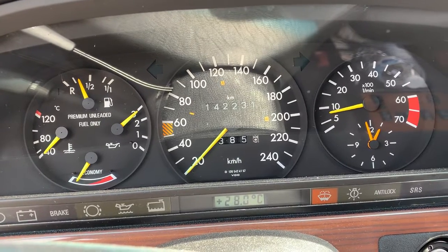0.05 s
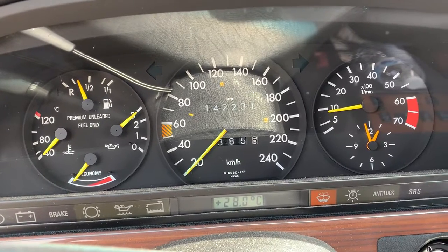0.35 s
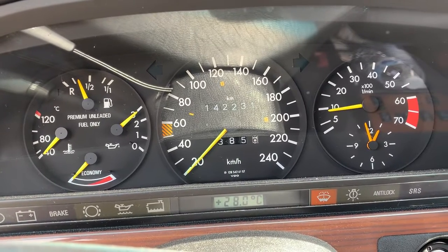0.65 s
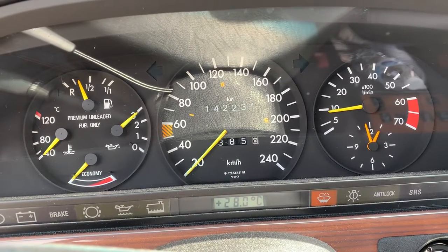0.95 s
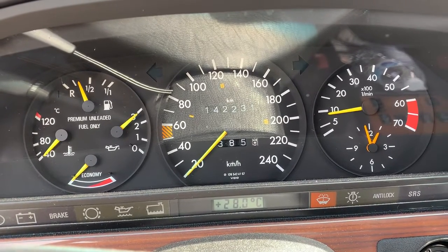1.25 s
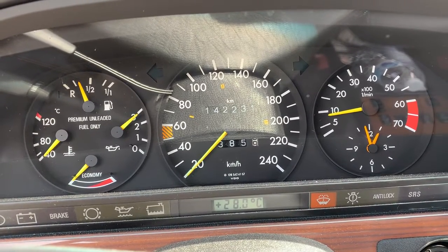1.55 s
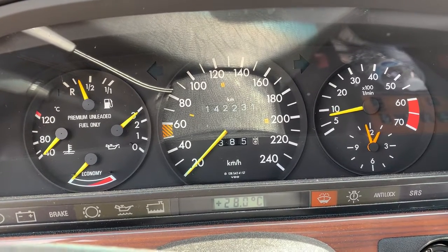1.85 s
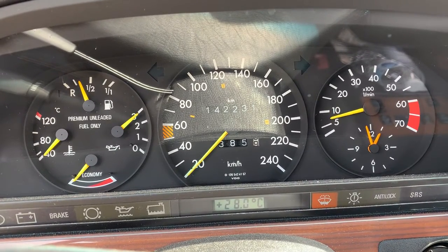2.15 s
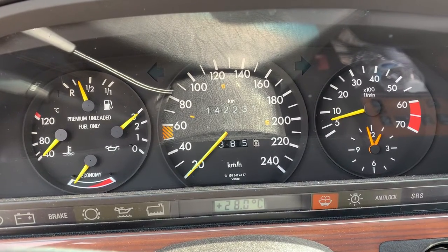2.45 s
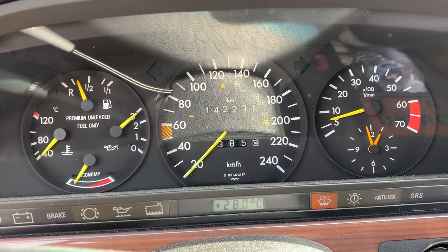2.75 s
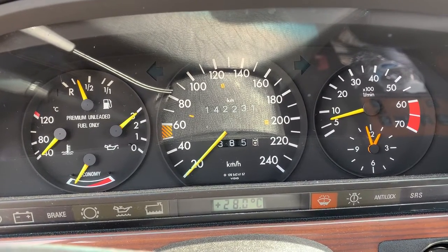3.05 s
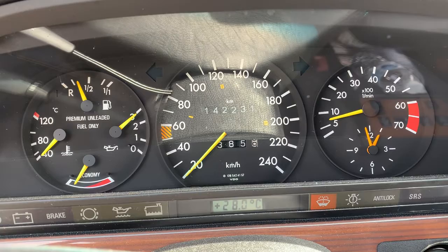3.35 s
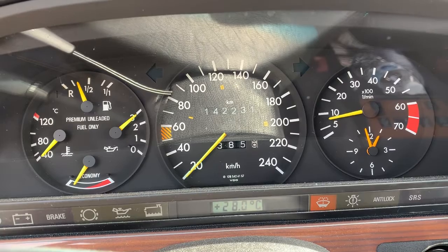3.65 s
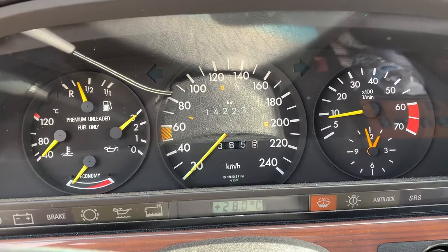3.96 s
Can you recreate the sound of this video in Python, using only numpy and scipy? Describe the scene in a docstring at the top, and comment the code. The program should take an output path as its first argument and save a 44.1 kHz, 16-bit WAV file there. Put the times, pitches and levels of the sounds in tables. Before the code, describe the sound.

Heard from inside a parked car, the idling engine booms low under a light whir, slows down, then picks up again. As it slows, a faint tick and two soft taps come from the trim near the microphone.

```python
"""V8 idle from the driver's seat

A stereo microphone in the parked car hears the engine speed sag and recover once. Uneven firings boom
in the cabin, belt-driven parts whine, and engine-bay noise comes through the panels.
Close by, the trim gives a small tick over a dull tap, then two more soft taps."""
import sys
import numpy as np
from scipy import signal
from scipy.fft import rfft, irfft
from scipy.io import wavfile

SR = 44100
rng = np.random.default_rng(int(sys.argv[2]) if len(sys.argv) > 2 else 0)


def dump(signal):
    """Clip the signal to [-1, 1] and save it as 16-bit WAV at the path in sys.argv[1]."""
    limited = np.clip(np.atleast_2d(signal).T, -1, 1)
    pcm = np.round(limited * 32767).astype(np.int16)
    wavfile.write(sys.argv[1], SR, pcm)


N = 176400
T, HZ = np.arange(N) / SR, np.fft.rfftfreq(N, 1 / SR)
MID_FIRING_HZ, CYLINDERS = 52, 8  # "octaves" is engine speed above or below this firing rate

# Firing boom at the seat: (time [s], level [dB])
BOOM = [(0, -32), (.3, -36.5), (.55, -35.5), (.75, -33), (1.05, -42), (1.35, -34.5), (1.8, -37.5),
        (2.05, -35), (2.4, -33.5), (3.05, -31.5), (3.4, -33), (4, -34)]
# Tones of the uneven idle: (multiple of the engine cycle rate)
LOPE_ORDERS = [5, 6, 7, 9, 10, 11, 12, 13, 16]
# For each of those tones: (level [dB], rise with speed [dB/octave])
LOPE = [(-47, 12), (-41.5, -3.5), (-53, -7), (-45, -6.5), (-49.5, -11), (-50.5, -1), (-52.5, -18),
        (-49.5, -13.5), (-55, -23.5)]
# Shudder of the body around the microphone: (frequency [Hz], relative density [dB])
RUMBLE = [(15, -36), (24, -20), (35, 2), (55, -2.5), (75, 6.5), (100, -1), (130, -11.5), (200, -25)]


def exhaust(turns, octaves):
    """The firings boom, a weak cylinder dents them once a cycle, and the body shudders as speed sags."""
    boom = amp(np.interp(T, *np.transpose(BOOM))) * np.exp(2j * np.pi * turns)
    boom *= 1 + .15 * waver(rate_hz=7.3)
    for order, (db, slope_db) in zip(LOPE_ORDERS, LOPE):
        lope = amp(db + slope_db * octaves) * np.exp(2j * np.pi * turns * order / CYLINDERS)
        boom -= lope * unit(1 + .3 * waver(rate_hz=2.1))
    low_cut = signal.butter(4, 29, "high", fs=SR, output="sos")
    bass = irfft(rfft(np.sqrt(2) * boom.real) * abs(signal.sosfreqz(low_cut, HZ, fs=SR)[1]), N)
    shudder = noise(amp(across(RUMBLE)) / (1 + (HZ / 300) ** 4))
    bass += amp(-43 - 1.5 * octaves) * shudder
    late_left = np.interp(T - 0.00063, T, bass)
    return pan(db=-4.5) * np.array([late_left, bass])


# Belt-driven parts, ahead of the seat: (multiple of the firing rate, level at resonance [dB],
# line width [Hz], cabin resonance [Hz], its half-width [Hz], pan [dB])
WHINES = [(2.19, -48, 9.8, 95, 6.7, -1.5), (2.66, -50, 11, 161, 16, -4), (3.0, -48.5, 16, 125, 6, 1),
          (4.47, -51.3, 8, 280, 13, 2), (5.47, -50.7, 5.5, 239, 9, 0.5), (3.2, -52.5, 40, 196, 14, -2),
          (8.2, -59.5, 10, 368, 6.5, -3), (10.0, -54.5, 36, 618, 36, 0.5), (15.05, -63, 11, 655, 30, -4.5),
          (15.1, -60, 15, 950, 30, 3)]
# Flutter of each part: (depth [dB])
WHINE_FLUTTER = [1, 3, 2, 3, 3, 2, 1, 7, 1, 5]


def belt_whines(rate, turns):
    """Each part sings at a multiple of the speed, flutters and swells as it meets a cabin resonance."""
    out = np.zeros((2, N))
    for (multiple, db, width_hz, peak_hz, reach_hz, pan_db), flutter_db in zip(WHINES, WHINE_FLUTTER):
        swell = amp(db) / np.hypot(1, (multiple * rate - peak_hz) / reach_hz)
        flutter = unit(amp(flutter_db * np.tanh(drift(rate_hz=28))))
        shared = 0.93 * np.exp(-width_hz / 15) + .5 * waver(width_hz / 2)
        voice = unit(np.array([shared + 0.33 * waver(width_hz / 2) for _ in range(2)]))
        tone = np.sqrt(2) * (voice * np.exp(2j * np.pi * multiple * turns)).real
        out += pan(pan_db) * swell * flutter * tone
    return out * unit(1 + 0.23 * np.cos(2 * np.pi * turns * 2 / CYLINDERS))  # one throb per crank turn


# Engine bay from inside the cabin, stereo mid: (frequency [Hz], relative density [dB])
BAY_MID = [(110, -5), (135, -7), (172, 0.5), (274, -4.5), (322, -15), (483, -21.5), (617, -14.5),
           (771, -25), (963, -21), (1200, -27), (1500, -25.5), (1840, -30), (2350, -27.5), (3300, -31),
           (4780, -42.5), (7000, -45.5), (10100, -54.5), (14000, -58.5)]
# Its stereo side: (frequency [Hz], relative density [dB])
BAY_SIDE = [(110, -4), (233, 1.5), (464, -8.5), (617, -3.5), (771, -8), (1090, -13), (1440, -5.5),
            (1900, -13.5), (2350, -16.5), (3670, -21.5), (4590, -29.5), (8430, -35.5), (14000, -47)]
# Ringing panels: (frequency [Hz], half-width [Hz], level [dB], left-right likeness [-1 to 1])
PANELS = [(950, 16.6, -61, -0.07), (1064, 31, -63.5, -0.15), (855, 18, -67.5, -0.021),
          (366.6, 6.4, -67.5, 0.96), (1600, 14, -69, -0.37), (2094, 110, -70, 0.12), (2370, 90, -72, 0.69),
          (3075, 35, -74, -0.39), (3270, 33, -88, -0.068), (4160, 21, -88, -0.19)]
# Bands of bay noise: (centre [Hz], rise with speed [dB/octave], firing throb [0-1], pan [dB])
BAY_BANDS = [(152, 8, 0.8, -0.5), (305, -1, 0.19, -1.5), (590, 12.5, 0.1, -0.5), (970, 1, 0.02, 4),
             (1470, 8.5, 0.24, 1.5), (2170, 3, 0, 0), (3340, 7, 0, 4), (6900, 3, 0.09, -1)]


def engine_bay(turns, octaves):
    """Fan and valve noise rings the panels, throbs with the firings and grows with speed."""
    low_cut = 1 / (1 + (105 / (HZ + 1)) ** 8)
    mid = amp(-47) * noise(amp(across(BAY_MID)) * low_cut * cabin_reflections())
    side = amp(-53) * noise(amp(across(BAY_SIDE)) * low_cut * cabin_reflections())
    for hz, width_hz, db, likeness in PANELS:
        ring = 1 / (1 + ((HZ - hz) / width_hz) ** 2)
        mid_share = np.clip((1 + likeness) / 2, 0, 1)
        mid += amp(db) * np.sqrt(mid_share) * noise(ring)
        side += amp(db) * np.sqrt(1 - mid_share) * noise(ring)
    spectrum = rfft(np.array([mid + side, mid - side]))
    centres = [row[0] for row in BAY_BANDS]
    flutter_db = 0.76 * drift(rate_hz=9.1)
    out = np.zeros((2, N))
    for weights, (_, slope_db, depth, pan_db) in zip(np.eye(len(centres)), BAY_BANDS):
        band = irfft(spectrum * across(list(zip(centres, weights))), N)
        throb = unit(1 + depth * np.cos(2 * np.pi * turns))
        out += pan(pan_db) * band * amp(slope_db * octaves + flutter_db) * throb
    return out


# Contacts of one tick, near the microphone: (time [s], level [dB])
TICK_CONTACTS = [(1.5355, -58), (1.5392, -51.5), (1.543, -59), (1.5463, -57), (1.5495, -60), (1.5527, -55),
                 (1.5575, -54.5)]
# Ring of each contact: (frequency [Hz], relative level [dB], t60 [s])
TICK_MODES = [(5890, -6, 0.023), (10000, -14, 0.019), (13200, -16, 0.03)]
# Snap of each contact: (frequency [Hz], relative density [dB])
TICK_SNAP = [(800, -20), (2500, -6), (4500, 5), (6500, 6), (8500, -4), (10500, -3), (14000, -17)]


def trim_tick(rise_s=0.00071, snap_db=-5, snap_t60=0.023):
    """Several quick contacts in the trim snap and ring, merging into one hard little tick."""
    out, t = np.zeros((2, N)), T[:SR // 5]
    for s, db in TICK_CONTACTS:
        ring = np.zeros((2, len(t)))
        for hz, mode_db, t60 in TICK_MODES:
            cycles = hz * rng.uniform(0.97, 1.04) * t + rng.random() + .2 * rng.random((2, 1))
            ring += amp(mode_db) * 1000 ** (-t / t60) * np.sin(2 * np.pi * cycles)
        hiss = np.array([noise(amp(across(TICK_SNAP)))[:len(t)] for _ in range(2)])
        snap = amp(snap_db) * hiss * 1000 ** (-t / snap_t60)
        add(out, s, amp(db) * np.minimum(t / rise_s, 1) * (ring + snap))
    return out


# Taps in the trim, centred in the image: (time [s], level [dB], ring [Hz], t60 [s])
TAPS = [(1.5388, -41, 2250, 0.028), (2.1028, -40.8, 1290, 0.023), (2.1405, -48.5, 3250, 0.017)]


def trim_taps(rise_s=0.0017):
    """Each soft tap rings the trim briefly at one pitch; the first lies under the tick."""
    out, t = np.zeros((2, N)), T[:SR // 5]
    for s, db, hz, t60 in TAPS:
        envelope = np.minimum(t / rise_s, 1) * 1000 ** (-t / t60)
        add(out, s, amp(db) * envelope * np.sin(2 * np.pi * hz * t))
    return out


def cabin_reflections(depth_db=2.5, spacing_hz=44.46):
    """Cabin reflections colour a spectrum with many small, steady peaks and dips."""
    knots = rng.standard_normal(4000)
    ripple = np.interp(HZ / spacing_hz, np.arange(len(knots)), knots)
    return amp(depth_db * ripple * np.minimum(HZ / 1200, 1))


def amp(db):
    """Decibels to gain."""
    return 10 ** (np.asarray(db) / 20)


def unit(x):
    """Scales to rms 1."""
    return x / np.sqrt(np.mean(abs(x) ** 2) + 1e-30)


def across(points):
    """Reads (Hz, value) points on a log-frequency axis."""
    hz, value = np.transpose(points)
    return np.interp(np.log(HZ + 1), np.log(hz + 1), value)


def noise(gain):
    """Noise of rms 1 with the given spectrum."""
    return unit(irfft(rfft(rng.standard_normal(N)) * gain, N))


def drift(rate_hz):
    """Slow random motion of rms 1."""
    return noise(np.exp(-.5 * (HZ / rate_hz) ** 2) * (HZ > 0))


def waver(rate_hz):
    """Slow random change of both size and phase."""
    return unit(drift(rate_hz) + 1j * drift(rate_hz))


def pan(db):
    """Left and right gains; positive decibels lean left."""
    return np.sqrt(2) * amp([[db / 2], [-db / 2]]) / np.hypot(amp(db / 2), amp(-db / 2))


def add(mix, s, sound):
    """Mixes a sound in at a time."""
    part = mix[:, round(s * SR):][:, :sound.shape[-1]]
    part += sound[..., :part.shape[1]]


# The idle sags and recovers: (time [s], firing rate [Hz])
SPEED = [(0.0, 59.1), (0.3, 62.2), (0.6, 62.5), (0.85, 61.7), (1.1, 57.7), (1.35, 55.0), (1.6, 51.0),
         (1.9, 45.0), (2.2, 41.9), (2.5, 43.6), (2.8, 43.9), (3.1, 48.1), (3.4, 51.9), (3.7, 58.8),
         (3.88, 60.7), (4.0, 62.3)]


def scene(first_firing_s=.005):
    """At the driver's seat: one speed drives boom, whines and bay noise, with the trim sounding nearby."""
    rate = np.interp(T, *np.transpose(SPEED))
    turns = np.cumsum(rate) / SR - first_firing_s * rate[0]  # one turn of phase per firing
    octaves = np.log2(rate / MID_FIRING_HZ)
    engine = exhaust(turns, octaves) + belt_whines(rate, turns) + engine_bay(turns, octaves)
    return engine + trim_tick() + trim_taps()


def record(dry):
    """The recorder cuts the treble above 14.5 kHz."""
    low_pass = signal.firwin(511, 14500, window=("kaiser", 9), fs=SR)
    return signal.oaconvolve(dry, low_pass[None], "same")


dry = scene()
out = record(dry)
dump(out)
```